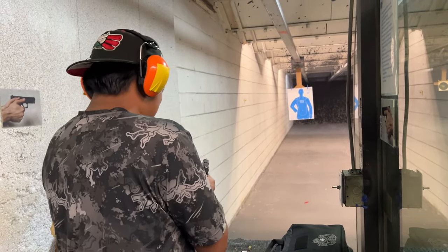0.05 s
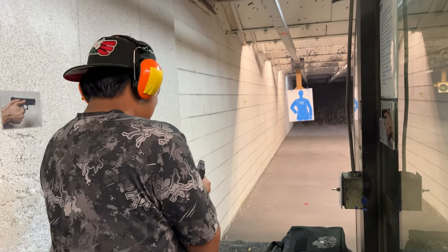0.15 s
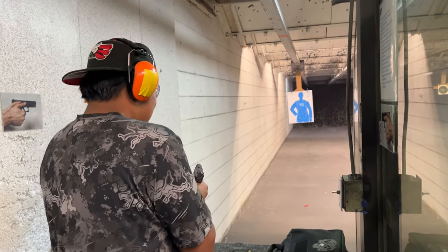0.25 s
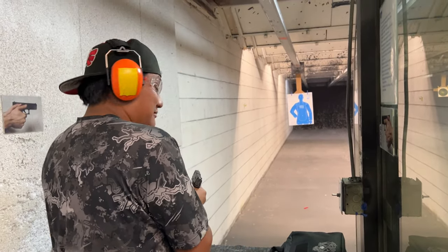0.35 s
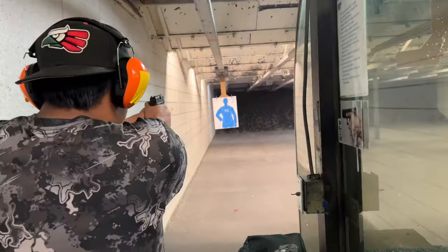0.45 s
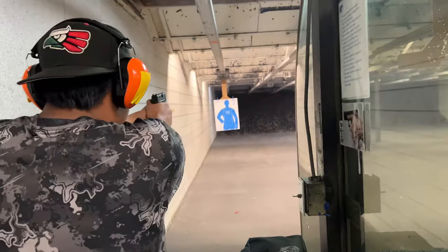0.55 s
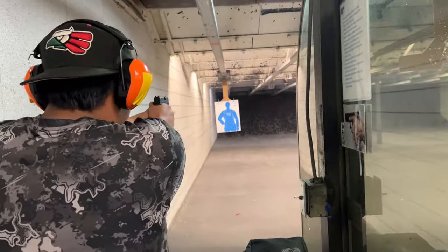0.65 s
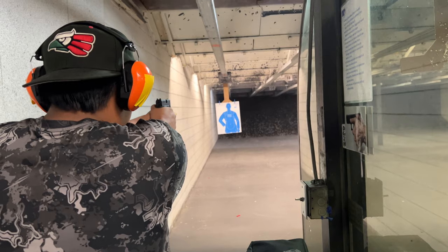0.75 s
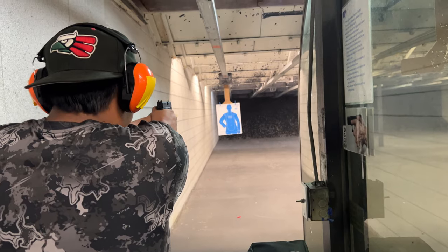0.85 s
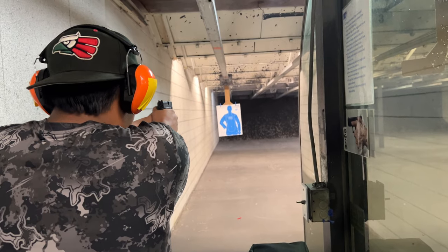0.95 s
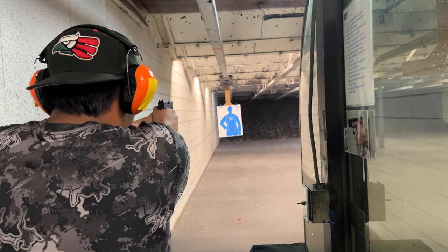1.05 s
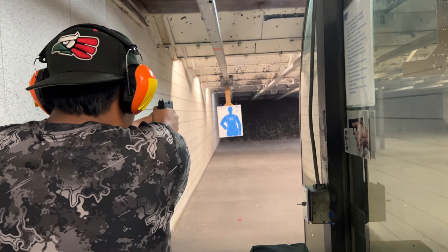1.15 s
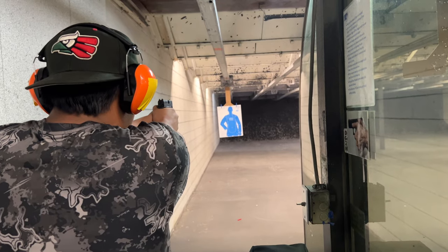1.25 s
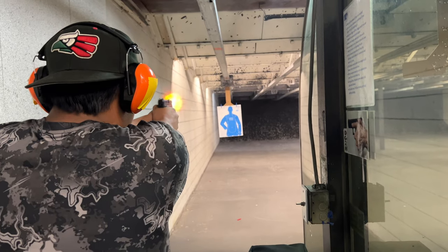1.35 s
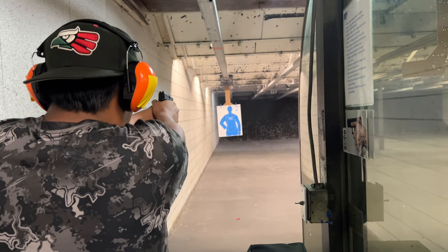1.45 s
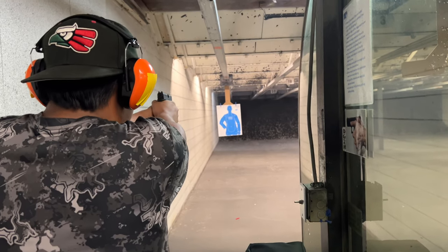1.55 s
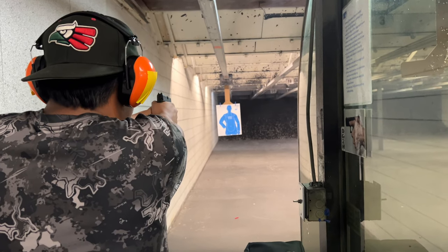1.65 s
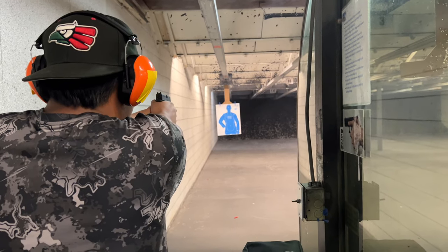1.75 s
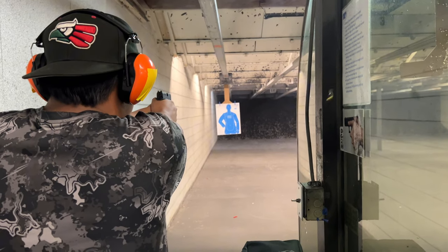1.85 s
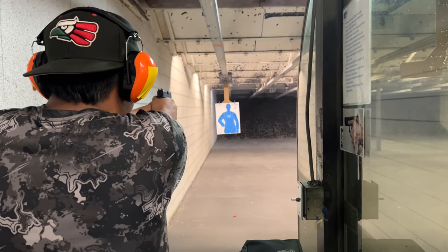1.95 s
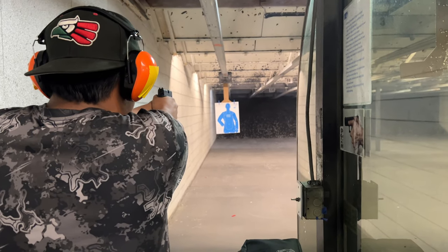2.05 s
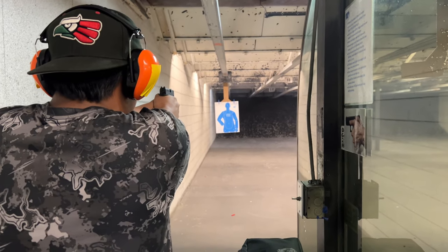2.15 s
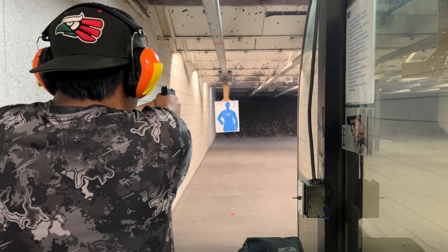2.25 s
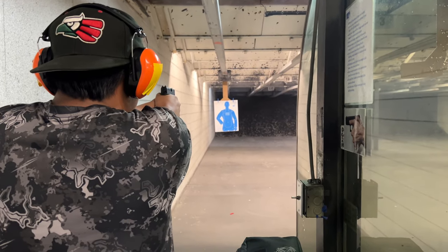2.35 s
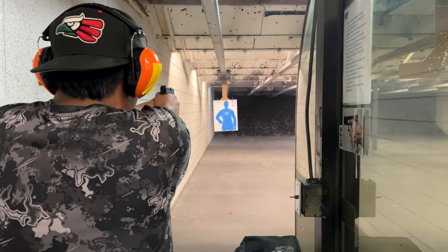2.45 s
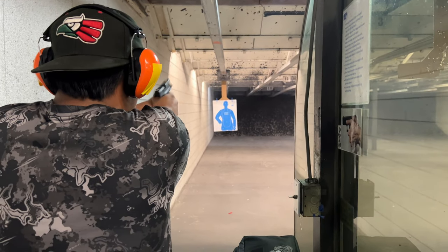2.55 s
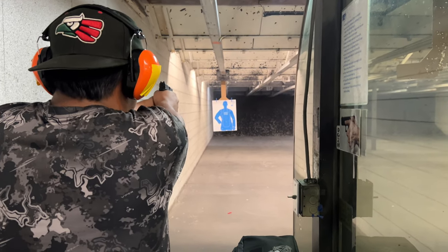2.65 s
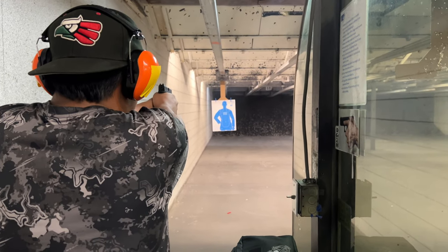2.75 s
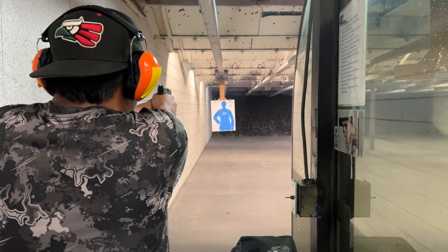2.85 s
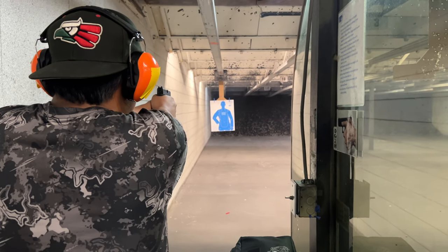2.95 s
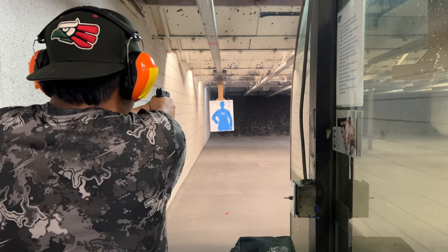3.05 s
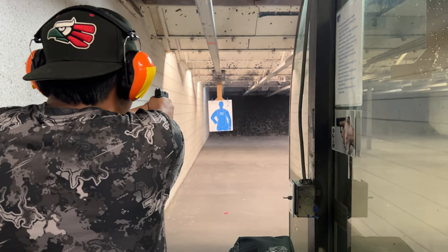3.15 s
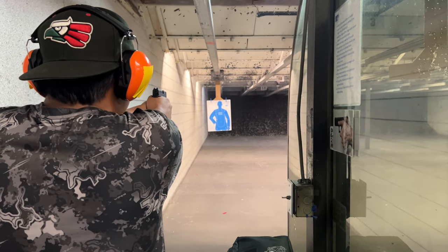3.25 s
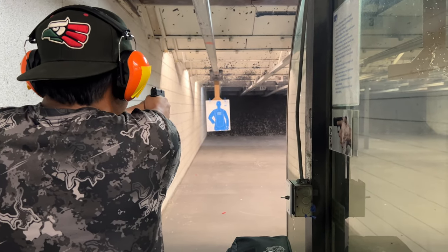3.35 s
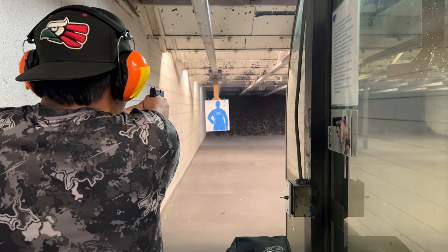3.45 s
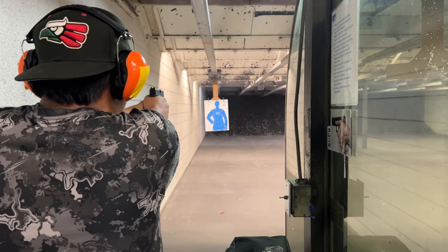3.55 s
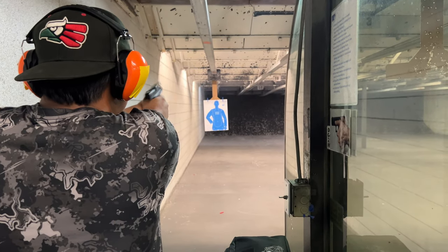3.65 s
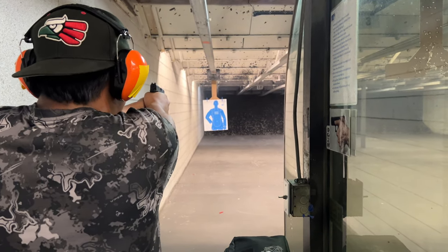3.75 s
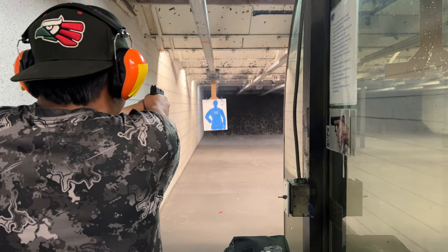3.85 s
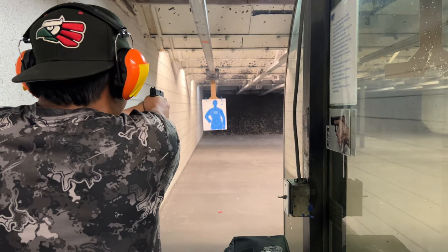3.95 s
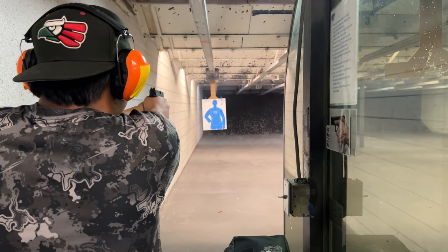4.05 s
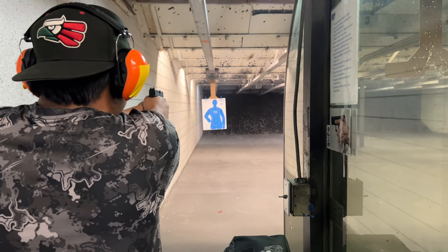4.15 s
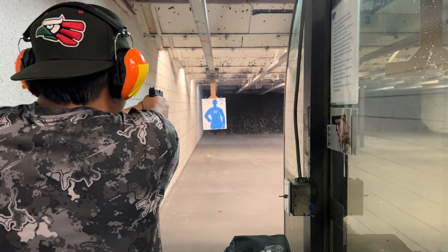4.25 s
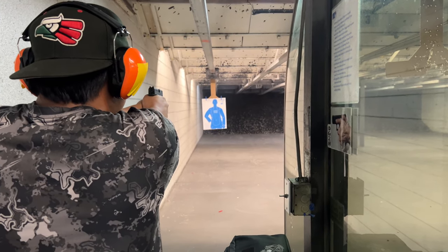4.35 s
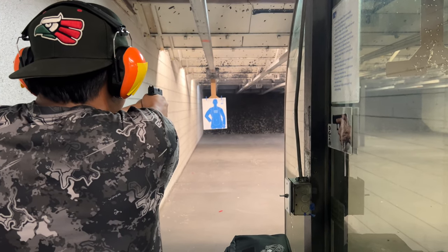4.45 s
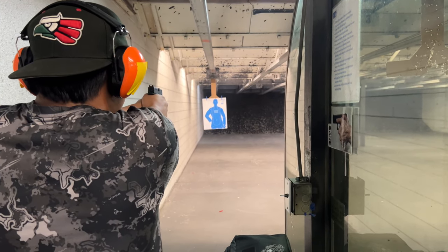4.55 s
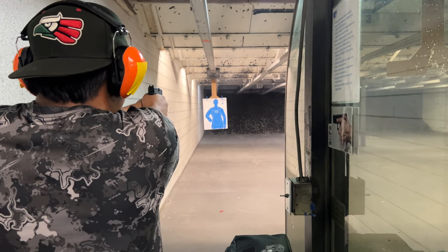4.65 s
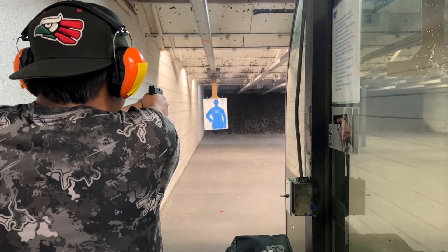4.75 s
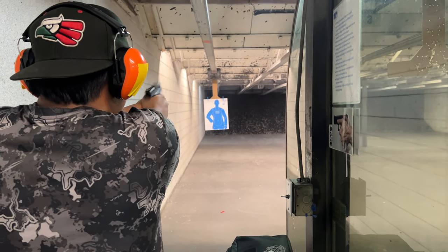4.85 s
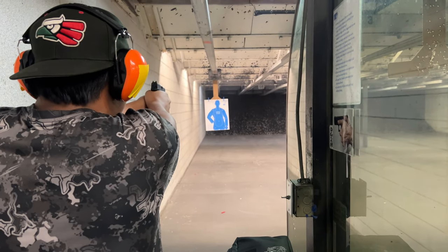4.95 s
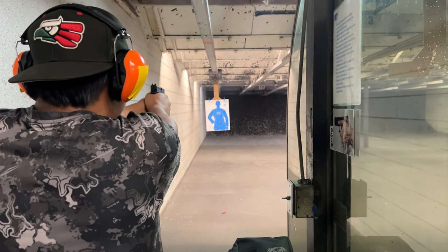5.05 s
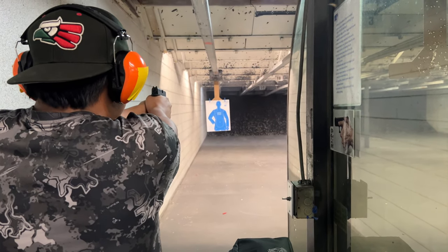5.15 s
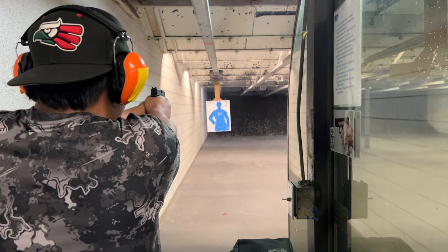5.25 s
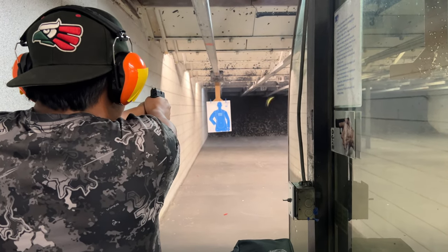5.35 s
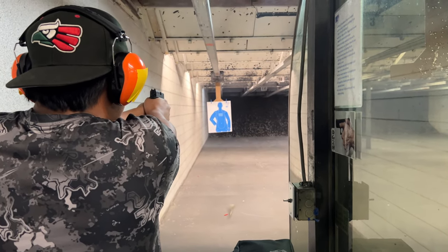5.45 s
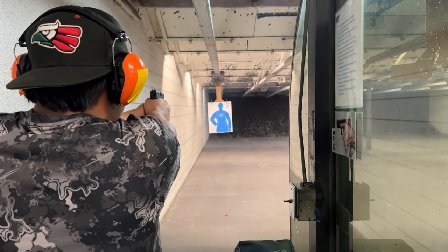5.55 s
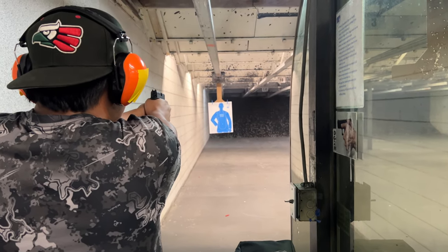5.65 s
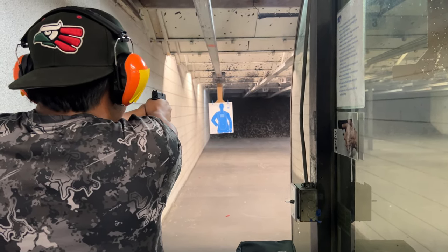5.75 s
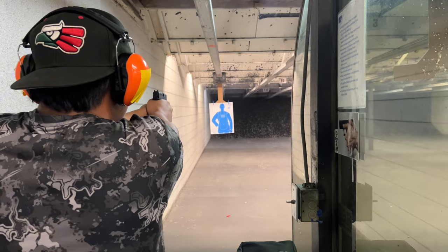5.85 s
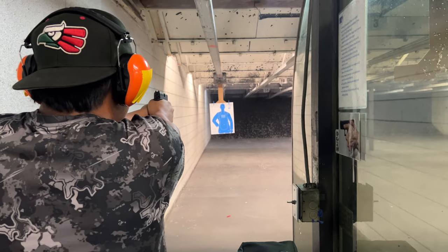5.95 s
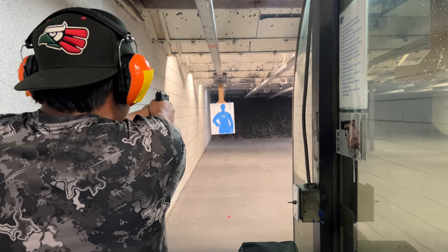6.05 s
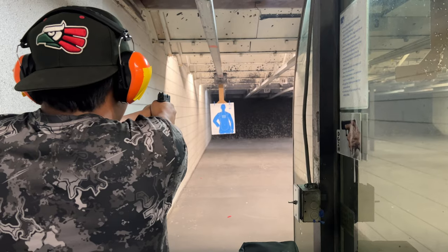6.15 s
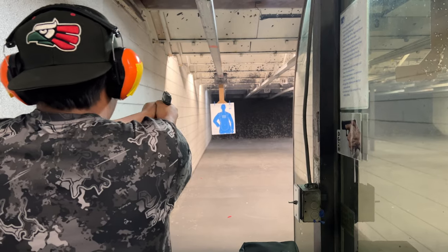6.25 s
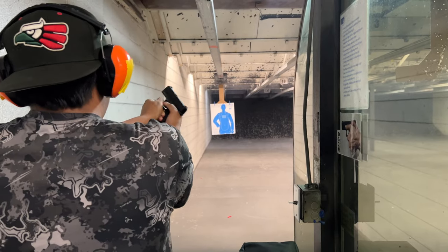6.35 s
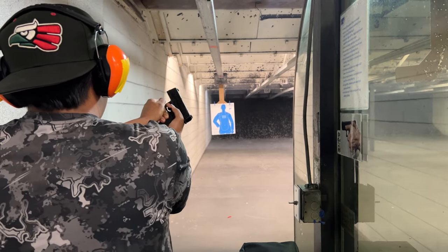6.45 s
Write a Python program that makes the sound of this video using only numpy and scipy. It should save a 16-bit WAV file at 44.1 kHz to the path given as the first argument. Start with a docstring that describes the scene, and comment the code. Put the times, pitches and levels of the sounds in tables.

```python
"""Indoor shooting range, in a booth: a pistol fires four times just ahead of the microphones.
Each blast is shaped noise: a crack, a rattle that fills the booth, then a roll down the concrete hall and back.
Other lanes fire before and between, duller, each with its own reflections. Knocks of gear and cases tick faintly.
It opens on loud ventilation noise; at a cut that stops, and a faint rumble with an earlier shot's tail begins.
A limiter holds the peaks."""
import sys
import numpy as np
from scipy import signal
from scipy.fft import rfft, irfft
from scipy.io import wavfile
from scipy.ndimage import uniform_filter1d

SR = 44100
rng = np.random.default_rng(int(sys.argv[2]) if len(sys.argv) > 2 else 0)


def master_out(mix):
    """Clip the mix to full scale and print it as 16-bit PCM to the path in sys.argv[1]."""
    frames = np.transpose(np.atleast_2d(mix))
    ceiling = np.clip(frames, -1, 1)
    pcm = np.round(ceiling * 32767).astype(np.int16)
    wavfile.write(sys.argv[1], SR, pcm)


N = 286796
AGE = np.arange(2 * SR) / SR  # seconds since a blow


def amp(db):
    """Decibels to gain."""
    return 10 ** (np.asarray(db) / 20)


def read(points, hz):
    """A table's value along a log-frequency axis."""
    f, value = np.transpose(points)
    return np.interp(np.log(hz + 1), np.log(f + 1), value)


def add(mix, start_s, sound):
    """Mixes a stereo sound in at its start time, cut off at the end of the mix."""
    part = mix[:, round(start_s * SR):][:, :sound.shape[1]]
    part += sound[:, :part.shape[1]]


def swell(delay, rise, t60, hold=0):
    """Envelope: waits, rises, holds, then dies away (all in seconds)."""
    t = np.maximum(AGE - delay, 0)
    attack = 1 - np.exp(-t / max(rise, 1e-5))
    decay = 1e-3 ** (np.maximum(t - hold, 0) / t60)
    return attack * decay


def lumps(depth_db, every_s, size=len(AGE)):
    """A gain of unit power that wanders at random: sound arrives in clumps."""
    knots = rng.standard_normal(size // 16)
    knot_position = np.arange(size) / SR / every_s
    gain = amp(depth_db * np.interp(knot_position, np.arange(len(knots)), knots))
    return gain / np.sqrt(np.mean(gain ** 2))


# likeness of the two microphones: [pitch_hz, correlation]
MIC_LIKENESS = [(40, 0.85), (170, 0.8), (300, 0.92), (450, 0.2), (650, 0), (900, 0.27), (1300, 0),
                (3000, 0.1), (9500, -.15), (10500, -.8), (11400, -0.9), (12200, 0.7)]
# left-right balance of near sound, then of diffuse sound: [pitch_hz, balance_db]
NEAR_BALANCE = [(100, 4), (400, -4), (900, 1), (2200, -1), (4000, 2.5), (5600, 8.5), (9000, 9), (12000, -1)]
HALL_BALANCE = [(60, -1.5), (200, -3.5), (500, -2.5), (1000, -2), (3500, -1), (5600, 6.5), (9000, 1),
                (12000, -1)]


def reflections(size=len(AGE), side=HALL_BALANCE):
    """Dense random arrivals at two microphones, alike in the bass, with a left-right balance."""
    hz = np.fft.rfftfreq(size, 1 / SR)
    left, other = rfft(rng.standard_normal((2, size)))
    same = np.clip(read(MIC_LIKENESS, hz), -1, 1)
    right = same * left + np.sqrt(1 - same ** 2) * other
    # half the balance goes to each side, at constant total power
    balance = amp(np.outer([.5, -.5], read(side, hz)))
    balance /= np.sqrt(np.mean(balance ** 2, 0))
    return irfft(balance * np.array([left, right]), size)


def colour(x, spectrum, modes=(), tilt_db=0, size=8192):
    """Causal filter of unit power: a smooth spectrum, resonances and a tilt in dB per octave."""
    hz = np.fft.rfftfreq(size, 1 / SR)
    db = read(spectrum, hz) + tilt_db * np.log2((hz + 20) / 1000)
    for mode_hz, width_hz, lift_db in modes:
        db = db + lift_db / (1 + (2 * (hz - mode_hz) / width_hz) ** 2)
    gain = amp(np.maximum(db, -100))
    log_gain = np.log(gain / np.sqrt(np.mean(gain ** 2)))
    # minimum phase: the Hilbert transform of the log gain supplies the phase
    circle = np.hstack([log_gain, log_gain[-2:0:-1]])
    response = np.exp(np.conj(signal.hilbert(circle)))
    taps = np.fft.ifft(response).real[:size // 2]
    return signal.fftconvolve(x, taps[None], axes=1)[:, :x.shape[1]]


def burst(envelope, side=HALL_BALANCE, order=3):
    """A clumpy cluster of reflections under an envelope, with no wide gaps in its spectrum."""
    x = reflections(side=side) * envelope * lumps(depth_db=1.0, every_s=0.0016)
    audible = envelope > envelope.max() / 1000
    for _ in range(order):
        # even out the broad spectrum, then trim what spilled outside the envelope
        z = rfft(x)
        power = uniform_filter1d(np.mean(abs(z) ** 2, 0), size=110)
        x = irfft(z / np.sqrt(abs(power) + 1e-12)) * audible
    return x * np.sqrt(2 * np.sum(envelope ** 2) / np.sum(x ** 2))


# spectrum of the hall's reverberation: [pitch_hz, level_db_per_hz]
HALL_SPECTRUM = [(35, -24), (55, -16), (90, -13), (140, -3.5), (200, -8.5), (400, 3), (900, 1.5),
                 (1400, -3.5), (2200, -13.5), (3500, -15), (6500, -15.5), (9500, -20), (11000, -33),
                 (15000, -36)]
# standing waves of the hall: [pitch_hz, width_hz, lift_db], negative at a node
HALL_STANDING_WAVES = [(56, 12, 5.5), (141, 13, -2.5), (217, 35, 4), (810, 55, 3.5), (2630, 400, 3.5),
                       (5420, 400, -4.5), (7450, 490, -11)]
# decay of the hall: [pitch_hz, t60_s]
HALL_DECAY = [(60, 1.4), (150, 1.01), (400, 0.88), (900, 1.075), (2500, 1.042), (5000, 0.85), (8000, 0.58),
              (14000, 0.26)]
# spectrum of the long lingering ring: [pitch_hz, level_db_per_hz]
LINGERING_RING = [(50, -11), (150, -12), (400, -3), (650, -2.5), (950, 3.5), (1350, -4), (1700, -14),
                  (2200, -9.5), (2900, -13), (3600, -21), (5000, -24.5), (9000, -53)]


def hall():
    """The hall's answer to a blast from one spot: clumpy reverberation and a long faint ring."""
    hz, t, z = signal.stft(reflections(), SR, nperseg=512)
    decay = 1e-3 ** (t / read(HALL_DECAY, hz)[:, None])  # each pitch dies at its own rate
    tail = signal.istft(z * decay, SR, nperseg=512)[1][:, :len(AGE)]
    tail = tail * (1 - np.exp(-AGE / 0.014)) * lumps(depth_db=0.98, every_s=.012)
    tail = colour(tail, HALL_SPECTRUM, HALL_STANDING_WAVES)
    ring = colour(reflections() * swell(delay=.03, rise=0.13, t60=2.17), LINGERING_RING)
    return amp(-17.0) * tail + amp(-42.0) * ring


def far_end(share):
    """Gain on the tail, which swells again when the blast comes back from the backstop."""
    return 1 + share * swell(delay=.235, rise=0.034, t60=7)


# spectrum of the loud ventilation: [pitch_hz, level_db_per_hz]
LOUD_VENTILATION = [(12, -39), (20, -7), (53, 0), (229, -15), (278, -20.5), (400, -16.5), (560, -28.5),
                    (774, -28.5), (889, -29.5), (1170, -32.5), (1510, -32), (2690, -40.5), (6360, -46),
                    (9110, -55), (15000, -74)]
# spectrum of the scuffs of handling: [pitch_hz, level_db_per_hz]
SCUFF_SPECTRUM = [(350, -40), (600, -8), (1040, -10), (1320, 4.5), (1440, -9), (2020, -6.5), (8660, -33),
                  (12000, -51), (15600, -81), (22000, -120)]
# scuffs of handling: [start_s, level_db]
SCUFF_CUES = [(0.324, -42.5), (.418, -57)]
# spectrum of the faint rumble: [pitch_hz, level_db_per_hz]
FAINT_RUMBLE = [(20, -19.5), (35, -8), (56, -1.5), (90, -7), (140, -10.5), (300, -14.5), (600, -25),
                (1020, -25.5), (2000, -40), (3550, -48), (7000, -51.5), (15000, -51.5)]
# faint ringing of the air ducts: [pitch_hz, width_hz, lift_db]
DUCT_RINGS = [(678, 20, 7.5), (904, 20, 1), (1039, 25, 4.5), (1211, 25, 3)]
CUT_S = .478  # the loud noise stops, the faint rumble begins
RUMBLE_DB, RUMBLE_FALL_DB_PER_S = -63.5, 1.74  # level at the cut, then a steady easing


def background():
    """A cut: loud ventilation noise and scuffs stop, and a faint rumble with an earlier shot's tail begins."""
    t, centre = np.arange(N) / SR, [(100, 0), (4000, -1)]  # balance: pitch_hz, balance_db
    air = colour(reflections(N, centre), LOUD_VENTILATION, tilt_db=0.38)
    loud = amp(-44) * lumps(depth_db=2.6, every_s=0.0255, size=N) * air
    scuff_envelope = swell(delay=0, rise=.025, t60=0.28, hold=0.025)
    for start_s, level_db in SCUFF_CUES:
        grains = reflections(side=centre) * lumps(depth_db=2.0, every_s=.005)
        add(loud, start_s, amp(level_db) * colour(grains * scuff_envelope, SCUFF_SPECTRUM))
    rumble = colour(reflections(N, centre), FAINT_RUMBLE, DUCT_RINGS)
    quiet = amp(RUMBLE_DB - RUMBLE_FALL_DB_PER_S * (t - CUT_S)) * rumble
    earlier_shot = colour(reflections(N), LINGERING_RING, tilt_db=0.4)
    quiet += amp(-54.5 - 38 * (t - CUT_S)) * earlier_shot  # dies by 38 dB a second
    fade = np.clip((t - CUT_S) / .01, 0, 1)  # a 10 ms crossfade
    return np.sqrt(1 - fade) * loud + np.sqrt(fade) * quiet


# faint knocks of gear: [start_s, level_db, brightness_db_per_octave]
KNOCK_CUES = [(2.235, -42, -1), (2.257, -49, -1), (2.275, -55, 2.5), (4.556, -49, -3), (5.736, -56.5, -1),
              (6.167, -66.5, -0.5)]
# spectrum of a knock: [pitch_hz, level_db_per_hz]
KNOCK_SPECTRUM = [(100, -4), (300, 1.5), (1000, 1.5), (2000, -8.5), (4000, -21.5), (9000, -31),
                  (15000, -42.5)]


def gear_knocks():
    """Short taps of filtered noise that all die away alike, each with a little of the hall."""
    out = np.zeros((2, N))
    envelope = swell(delay=0, rise=0.00049, t60=.05) + .1 * swell(delay=0, rise=.01, t60=.5)
    for start_s, level_db, tilt_db in KNOCK_CUES:
        knock = colour(reflections() * envelope, KNOCK_SPECTRUM, tilt_db=tilt_db)
        add(out, start_s, amp(level_db) * knock)
    return out


# spent cases skittering on the floor: [start_s, level_db, scrape_t60_s, pitch_hz]
CASE_CUES = [(3.967, -52, .06, 10030), (5.693, -64, 0.36, 10400), (6.272, -82, 0.19, 10530)]
# colour of the brass: [pitch_hz, width_hz, lift_db]
BRASS_COLOUR = [(6500, 1500, 3.8), (10200, 150, 12), (12700, 500, 3)]
CASE_RING_DB, CASE_SPLIT_HZ = -14, 55  # ring against the scrape; distance between its two modes


def spent_cases():
    """Brass skitters as bright scraping noise and rings briefly in a close pair of modes."""
    out = np.zeros((2, N))
    scrape_spectrum = [(1500, -25), (5000, 10), (9000, 1), (15000, -17)]
    ring_envelope = swell(delay=0, rise=0.0019, t60=0.22)
    for start_s, level_db, t60_s, pitch_hz in CASE_CUES:
        scrape = reflections() * swell(delay=0, rise=0.0029, t60=t60_s)
        add(out, start_s, amp(level_db) * colour(scrape, scrape_spectrum, BRASS_COLOUR))
        ring = np.zeros((2, len(AGE)))
        for mode_hz in (pitch_hz, pitch_hz + CASE_SPLIT_HZ):
            ring += np.sin(2 * np.pi * (mode_hz * AGE + rng.random((2, 1))))
        add(out, start_s, amp(level_db + CASE_RING_DB) * ring * ring_envelope)
    return out


def lane():
    """One other lane: a dull front through the partitions, a sharp bounce off the ceiling, the hall."""
    body = burst(swell(delay=0, rise=0.0062, t60=0.37, hold=0.041))
    bounce = burst(swell(delay=0.0095, rise=0.0037, t60=0.078, hold=0.006), NEAR_BALANCE)
    return body, bounce, hall()


# shots in other lanes: [start_s, lane_number, level_db, crack_db, hall_db,
# brightness_db_per_octave, far_end_share]; hall_db stands apart from level_db
LANE_CUES = [(0.788, 0, 1, 0, 4.5, .5, .15), (2.773, 1, -7, 4, 0, 0, 0.28),
             (3.114, 2, -2, 0, 0.5, -0.74, 0.12), (4.788, 0, -3, 0.5, -6, 0.1, 0.37)]
# spectra of a blast that comes round the partitions, its bounce and its body: [pitch_hz, level_db_per_hz]
LANE_BOUNCE_SPECTRUM = [(120, -25), (200, -1), (1650, -11.5), (2210, -4), (3430, -4.5), (4120, -10.5),
                        (6170, -6), (7540, -16.5), (8420, -12.5), (9930, -16), (10700, -25.5),
                        (14900, -34.5), (16000, -43.5)]
LANE_BODY_SPECTRUM = [(29, -49), (50, -17), (141, -17), (223, -6.5), (439, -3), (572, -13.5), (783, -0.5),
                      (1360, -8.5), (1470, -7.5), (1910, -11), (6240, -22), (9870, -33), (10900, -36.5),
                      (14200, -36), (16000, -54)]
# standing waves near the microphones, for a far blast: [pitch_hz, width_hz, lift_db]
LANE_STANDING_WAVES = [(227, 36, 6.2), (423, 45, 9.8), (550.6, 40, 1), (666, 63, 3.5), (830, 51, 4.9),
                       (960, 65, 3), (3300, 340, 1.2), (6140, 620, 3.2), (8520, 900, 5.8)]


def other_pistols():
    """Shots from three other lanes, each lane with its own pattern of reflections."""
    lanes, out = [lane() for _ in range(3)], np.zeros((2, N))
    for start_s, number, level_db, crack_db, hall_db, tilt_db, echo in LANE_CUES:
        body, bounce, room = lanes[int(number)]
        shot = amp(-14) * colour(body, LANE_BODY_SPECTRUM, LANE_STANDING_WAVES, tilt_db=tilt_db)
        shot += amp(crack_db - 14.5) * colour(bounce, LANE_BOUNCE_SPECTRUM, tilt_db=tilt_db)
        add(out, start_s, amp(level_db) * shot + amp(hall_db) * room * far_end(echo))
    return out


# the near pistol: [start_s, crack_db, thump_db, far_end_share]
NEAR_CUES = [(1.3627, 1, -4, 1), (2.547, 1.5, 5, 0.39), (3.6507, 0.5, -7, 0.054), (4.8538, 3, 1, 0.12)]
# spectra of the near blast, its front and its rattle between the booth walls: [pitch_hz, level_db_per_hz]
CRACK_SPECTRUM = [(59, -49), (100, -20.5), (461, -11), (784, -4), (1170, 0.5), (1760, -4.5), (1950, -11.5),
                  (2470, -8), (2860, -15.5), (6020, -13), (7610, -23.5), (9210, -20.5), (10500, -31),
                  (14700, -28), (16000, -33)]
BOOTH_SPECTRUM = [(35, -41), (60, -19.5), (380, -3.5), (767, -9), (842, -5), (1340, -15), (1470, -16),
                  (3420, -20), (6740, -24.5), (8710, -28.5), (10000, -42), (11000, -59.5), (12400, -34.5),
                  (14600, -40.5), (16000, -71.5)]
# standing waves near the microphones: [pitch_hz, width_hz, lift_db], negative at a node
BOOTH_STANDING_WAVES = [(91.5, 35, -6.5), (172, 36, -3.5), (232, 25, 4), (286, 11, 6.5), (368, 10, 8),
                        (407.5, 27, 8.5), (597, 13, 3), (670, 35, 10), (818, 27, 4), (957, 110, 9),
                        (1059, 61, 1.5), (1294, 61, 8.5), (1483, 100, 10.5), (2116, 32, 12), (2280, 38, 6),
                        (2440, 35, 2.5)]
NEAR_DB, NEAR_HALL_DB = -1, 1.24  # every round is loaded alike: trims for the booth and the hall


def near_pistol():
    """The muzzle stays in one spot, so every shot meets the same walls and sounds nearly alike."""
    front = burst(swell(delay=0, rise=.0005, t60=0.06, hold=0.0027), NEAR_BALANCE)
    crack_lifts = [(5600, 2300, 0.44), (14000, 4000, -1)]
    crack = amp(-10.5) * colour(front, CRACK_SPECTRUM, crack_lifts, tilt_db=1.5)
    rattle = burst(swell(delay=0.0023, rise=0.0045, t60=0.22, hold=0.028), NEAR_BALANCE)
    booth = amp(-11.0) * colour(rattle, BOOTH_SPECTRUM, BOOTH_STANDING_WAVES)
    # a strong low reflection, then a second wave from across the lanes
    low = burst(swell(delay=0.024, rise=0.0024, t60=0.072, hold=0.0074))
    low_spectrum = [(70, -21.0), (150, -5.5), (260, -2.5), (440, -8), (900, -29), (3000, -57.0)]
    booth += amp(-14.5) * colour(low, low_spectrum)
    across = burst(swell(delay=.054, rise=0.0052, t60=0.18, hold=0.02))
    across_spectrum = [(100, -16.0), (350, 2.5), (1000, 0.0), (2500, -20.0), (6000, -28.0), (15000, -52.5)]
    booth += amp(-20.5) * colour(across, across_spectrum)
    # the slide slams home a moment after the shot
    slam = burst(swell(delay=.0345, rise=.0005, t60=0.033, hold=0.012), NEAR_BALANCE)
    slide_spectrum = [(500, -19.5), (2500, -6.5), (5500, 3.5), (9000, -8.0), (15000, -19.5)]
    slide = amp(-26.5) * colour(slam, slide_spectrum)
    # the powder gas pushes the air in the booth
    gas = burst(swell(delay=0.016, rise=.018, t60=.03, hold=.045))
    gas_spectrum = [(20, -16.5), (52, -2), (70, -1.5), (100, -8.5), (160, -17.0), (500, -58.5), (2000, -90.5)]
    thump = amp(-33) * colour(gas, gas_spectrum)
    room, out = hall(), np.zeros((2, N))
    for start_s, crack_db, thump_db, echo in NEAR_CUES:
        # the flash and a little of the hall are fresh for each shot
        flash_noise = reflections(side=NEAR_BALANCE) * swell(delay=0, rise=0.00068, t60=0.079)
        flash = amp(-22) * colour(flash_noise, CRACK_SPECTRUM)
        shot = amp(crack_db) * (crack + flash) + booth + slide + amp(thump_db) * thump
        tail = (room + 0.18 * hall()) * far_end(echo)
        add(out, start_s, amp(NEAR_DB) * shot + amp(NEAR_HALL_DB) * tail)
    return out


def partitions(x, share=0.4, count=12):
    """Glass and wall beside the microphones add a few hard reflections, which comb the mids and treble."""
    taps = np.zeros((2, 2048))
    for side in taps:
        arrivals = rng.integers(60, 900, count)  # samples
        side[arrivals] = rng.choice([-1, 1], count) * share / np.sqrt(count)
    band = signal.butter(2, [600, 4500], "band", fs=SR, output="sos")
    taps = signal.sosfilt(band, taps)
    bounced = signal.oaconvolve(x, taps, axes=1)[:, :N]
    return (x + bounced) / np.sqrt(1 + share ** 2 / 2)


def scene():
    """Pistols, gear and brass heard between the partitions, over the background."""
    events = near_pistol() + other_pistols() + gear_knocks() + spent_cases()
    return partitions(events) + background()


def record(dry, limit_db=-6.5, recovery_db=140, attack_s=.004):
    """A limiter lets the first crack through and then holds the boom down; soft overload; the band limit."""
    keep = np.exp(-1 / (attack_s * SR))
    power = signal.lfilter([1 - keep], [1, -keep], (dry ** 2).mean(0))
    power_db = 10 * np.log10(power + 1e-12)
    fall = np.arange(N) * recovery_db / SR  # recovery_db is regained each second
    held_db = np.maximum.accumulate(power_db + fall) - fall
    over_db = np.maximum(held_db - limit_db, 0)
    held = dry / amp(uniform_filter1d(over_db, size=60))
    held = held / (1 + held ** 6) ** (1 / 6)  # soft overload
    low_pass = signal.firwin(161, 16000, window=("kaiser", 9), fs=SR)  # edge in Hz
    return signal.oaconvolve(held, low_pass[None], "same")


dry = scene()
out = record(dry)
master_out(out)
```